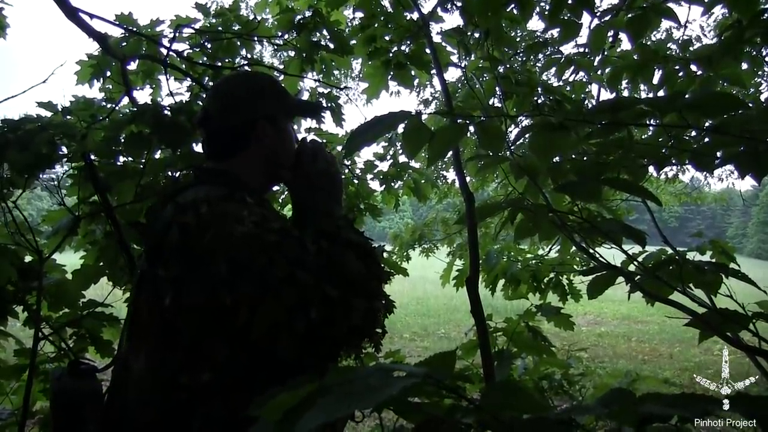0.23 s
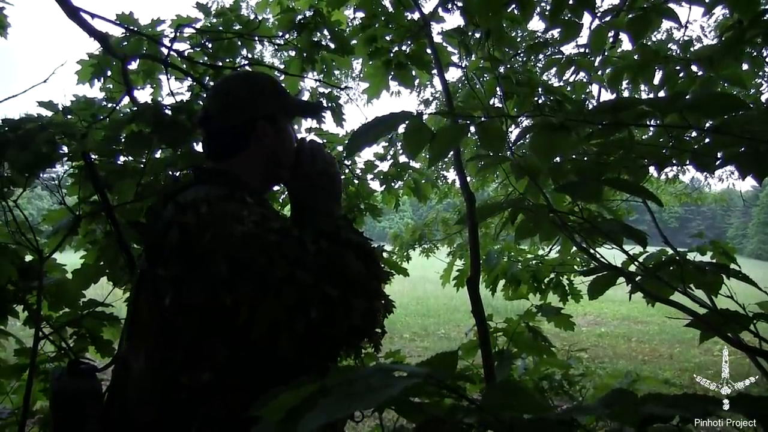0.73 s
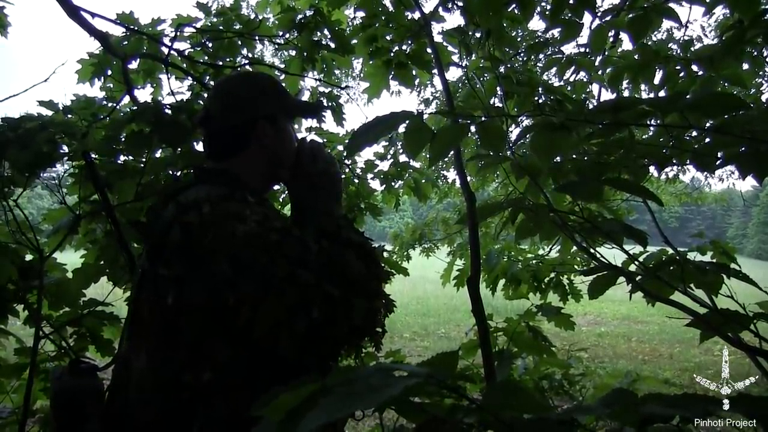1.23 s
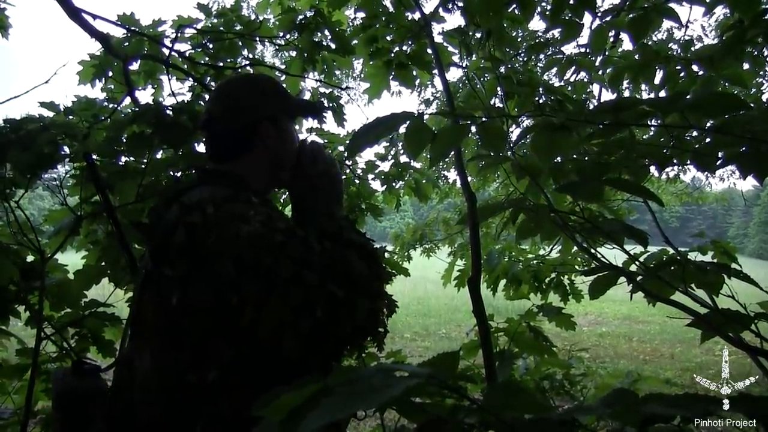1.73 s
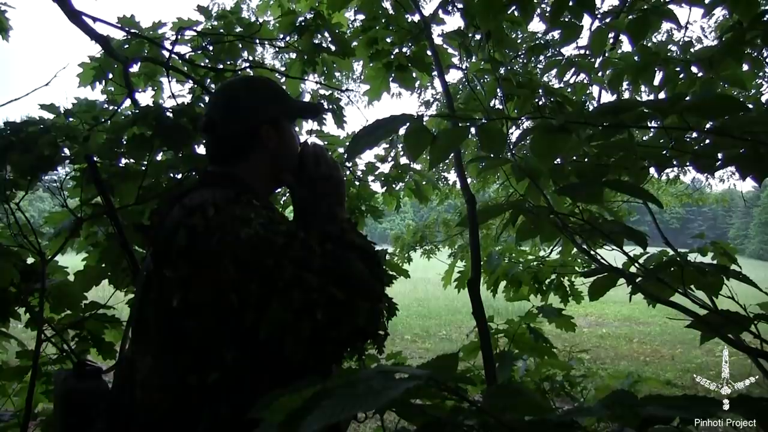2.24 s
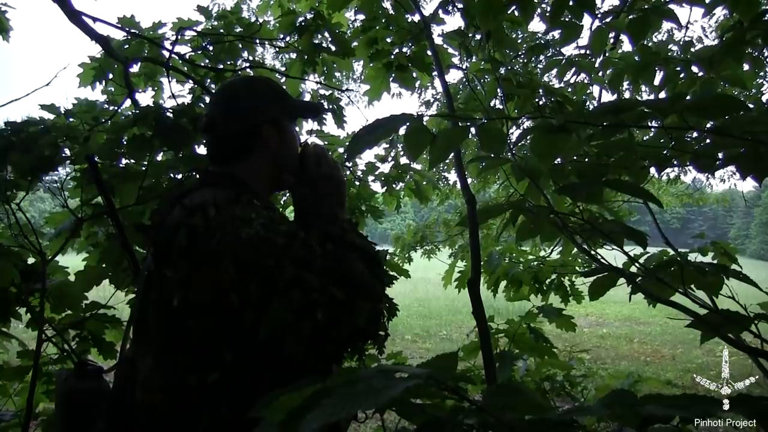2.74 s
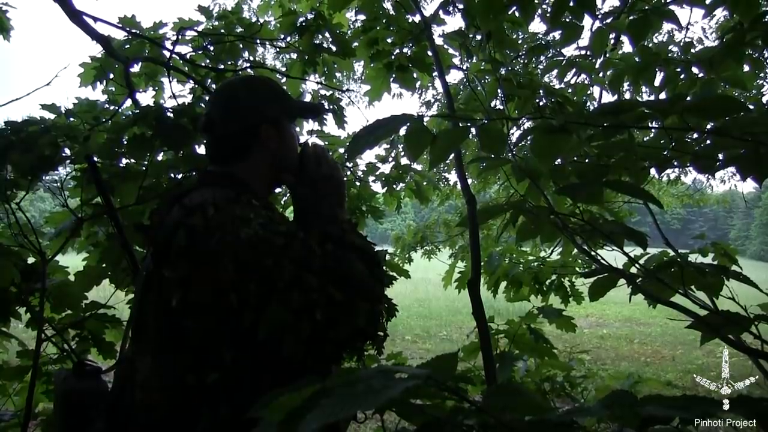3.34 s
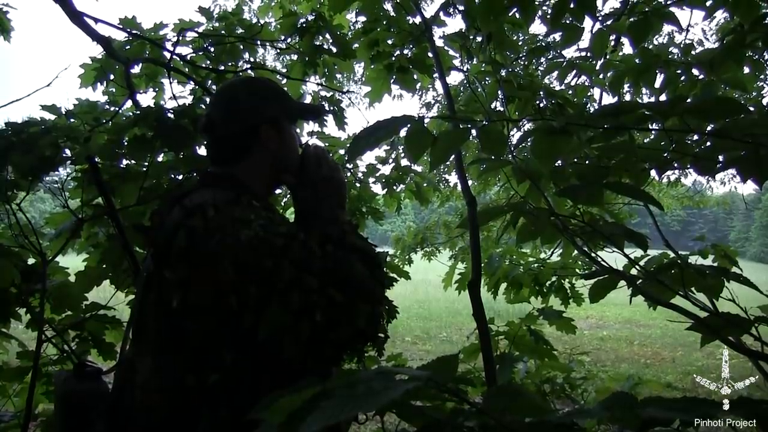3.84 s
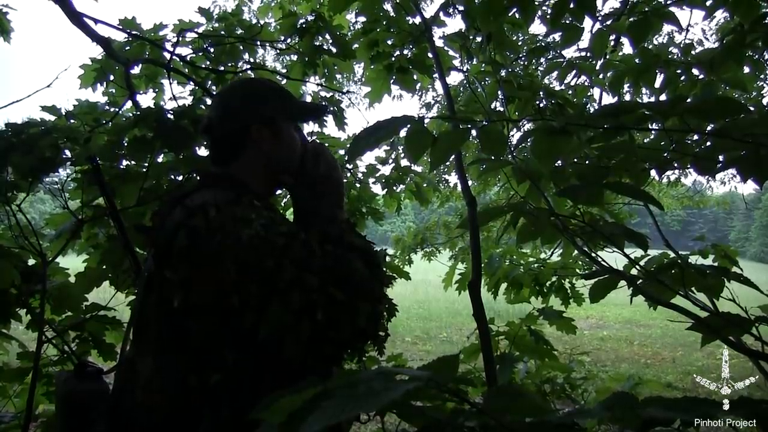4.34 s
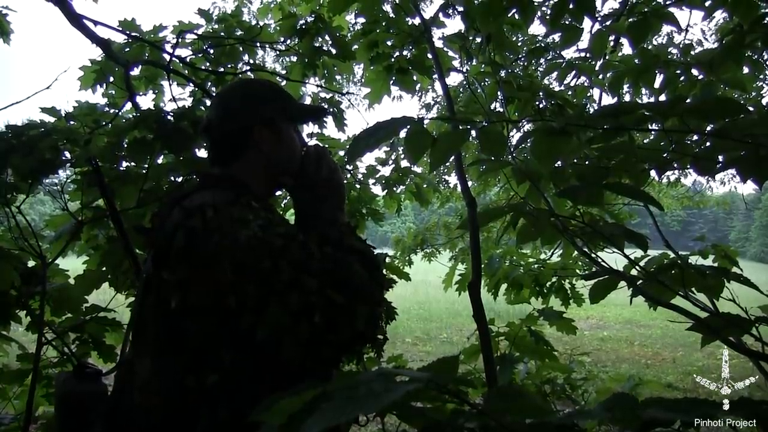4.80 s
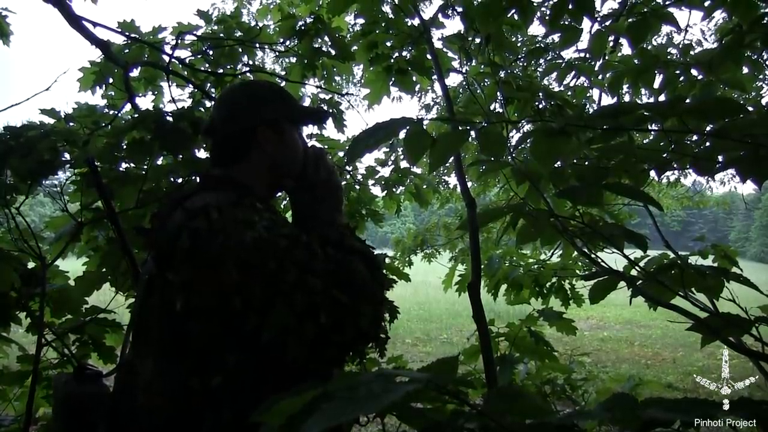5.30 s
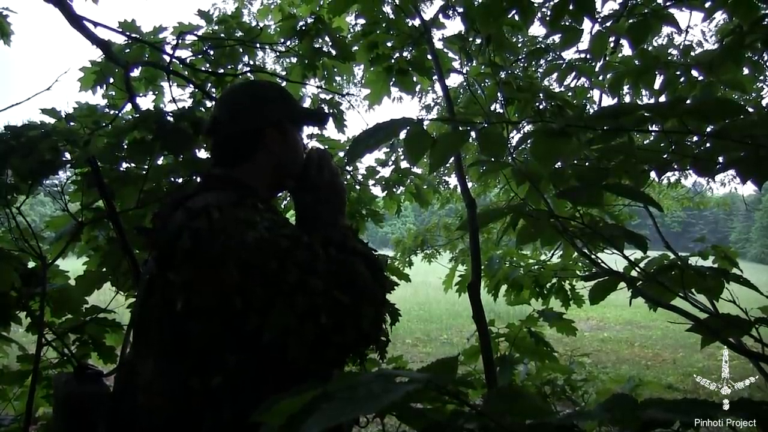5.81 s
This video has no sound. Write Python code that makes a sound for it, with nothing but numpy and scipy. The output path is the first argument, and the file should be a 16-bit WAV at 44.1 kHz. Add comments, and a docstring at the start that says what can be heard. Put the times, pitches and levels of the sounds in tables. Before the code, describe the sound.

Quiet summer woods with constant cricket chirping, sliding birdsong and distant hoarse caws, then two bright hollow drop-like plops close to the microphone.

```python
"""A forest edge in summer, with two water-drop plops close to the microphone: ringing cavities that leap in pitch.
The trees answer them with decaying noise echoes. A songbird whistles short gliding tones among the leaves;
faint whistles come from deeper in the wood, and a crow caws four hoarse harmonic stacks far off.
Crickets chirp in short falling notes without a break, over soft low bumps, hissing air and a distant rumble.
The camera's limiter ducks the background for a moment after each plop."""
import sys
import numpy as np
from scipy import signal
from scipy.fft import rfft, irfft, next_fast_len
from scipy.io import wavfile
from scipy.ndimage import map_coordinates

SR = 44100
rng = np.random.default_rng(int(sys.argv[2]) if len(sys.argv) > 2 else 0)


def wav_out(sig):
    """Save sig, one row per channel (or a flat mono array), as 16-bit PCM at SR to the path in sys.argv[1]."""
    wavfile.write(sys.argv[1], SR, np.round(np.clip(np.atleast_2d(sig).T, -1, 1) * 32767).astype(np.int16))


N = 267246  # length in samples


def amp(db):
    """Amplitude factor for a level in dB."""
    return 10 ** (np.asarray(db) / 20)


def unit(x):
    """x scaled to rms 1."""
    return x / np.sqrt(np.mean(x ** 2) + 1e-20)


def along(points, hz):
    """Values at hz, read between (f/Hz, value) points on a log frequency axis."""
    f, v = np.transpose(points)
    return np.interp(np.log(hz + 1), np.log(f + 1), v)


def wobble(rate, size=N):
    """A smooth random curve with `rate` random knots a second."""
    knots = rng.standard_normal(int(size * rate / SR) + 4)
    return map_coordinates(knots, [np.arange(size) * rate / SR])


def ramp(x):
    """A smooth step from 0 to 1 as x goes from 0 to 1."""
    return np.sin(np.pi / 2 * np.clip(x, 0, 1)) ** 2


def filtered(x, response):
    """x times a response of frequency, padded so that its tail does not wrap onto the start."""
    m = next_fast_len(len(x) + 8192)
    spectrum = rfft(x, m) * response(np.fft.rfftfreq(m, 1 / SR))
    return irfft(spectrum, m)[:len(x)]


def coloured(x, spectrum):
    """x shaped by (f/Hz, level/dB) points, at rms 1."""
    return unit(filtered(x, lambda hz: amp(along(spectrum, hz))))


def noise(spectrum, size=N):
    """Noise of rms 1 shaped by the given spectrum."""
    return coloured(rng.standard_normal(size), spectrum)


def add(track, s, sound):
    """Mix a sound into the track at time s."""
    part = track[max(0, round(s * SR)):][:len(sound)]
    part += sound[:len(part)]


def turning(hz):
    """Phase of a tone with a moving pitch."""
    return 2 * np.pi * np.cumsum(hz) / SR


def foliage(x, t60, delay):
    """Nearby leaves and trunks scatter a short, dense echo: decaying noise after a delay in s."""
    t = np.arange(SR // 2) / SR
    tail = rng.standard_normal(len(t)) * amp(-60 * t / t60) * (t > delay)
    return signal.fftconvolve(x, tail / np.linalg.norm(tail))[:N]


def forest(x, build):
    """The far trees: an echo that builds up over `build` s while each frequency dies at its own speed."""
    # decay of the forest's echo: f/Hz, t60/s
    wood_decay = [(200, 0.38), (800, 1.58), (1250, 2.184), (1900, 1.4), (3200, 2), (8000, 0.847)]
    hz, t, bins = signal.stft(rng.standard_normal(2 * SR), SR, nperseg=256)
    decay = amp(-60 * t / along(wood_decay, hz)[:, None])
    tail = signal.istft(bins * decay * (1 - np.exp(-t / build)), SR, nperseg=256)[1]
    return signal.fftconvolve(x, tail / np.linalg.norm(tail))[:N]


def air(air_db=-54, rumble_db=-59):
    """Two shaped noises: a hiss and a distant rumble, each wandering slightly in level."""
    # open air and far leaves: f/Hz, relative level/dB per Hz
    air_colour = [(20, -45.5), (60, -24.5), (200, -2.5), (450, -0.5), (900, -3.5), (1300, -5), (2300, -5),
                  (2900, -2), (3500, -2.5), (4200, -3.5), (5600, -4), (8000, -7.5), (12000, -11),
                  (15800, -16)]
    # distant rumble: f/Hz, relative level/dB per Hz
    rumble_colour = [(20, -49), (40, -27.5), (65, -16.5), (95, -6), (120, -2), (170, -5.5), (260, -9),
                     (500, -19), (1200, -48)]
    hiss = amp(air_db + 0.65 * wobble(3.2)) * noise(air_colour)
    rumble = amp(rumble_db + 0.38 * wobble(5)) * noise(rumble_colour)
    return hiss + rumble


def bumps(rise=0.00335, t60=0.07):
    """Dull low thuds: sines that rise within milliseconds (s) and die away after a few cycles."""
    # soft low bumps: t/s, f/Hz, approximate peak level/dB
    thuds = [(1.395, 127.5, -34.5), (1.425, 115, -38.5), (1.456, 108.8, -41), (4.331, 115.8, -44)]
    out, t = np.zeros(N), np.arange(SR // 4) / SR
    for s, hz, db in thuds:
        envelope = 2 * amp(db - 60 * t / t60) * (1 - np.exp(-(t / rise) ** 2))  # 2 offsets the early decay
        add(out, s, envelope * np.sin(2 * np.pi * hz * t))
    return out


def crickets(count=440, start_hz=4960, fall=0.122, length=0.02685, near_db=-53.5, far_db=-54, drift_db=0.92):
    """Every wing stroke is a short falling note; the far insects blur into one band of noise."""
    # the far insects' band: f/Hz, relative level/dB
    chorus = [(3600, -32), (4100, -8.5), (4450, -1.5), (4700, -2.5), (4900, 2), (5030, -5.5), (5110, -0.5),
              (5280, -13), (5700, -50)]
    strokes = np.zeros(N)
    u = np.linspace(0, 1, int(length * SR))
    for k, (when, pitch, size) in enumerate(rng.standard_normal((count, 3))):
        hz = start_hz * (1 + .022 * pitch) * (1 - fall * u ** 1.373)
        loudness = amp(5 * np.tanh(size))  # within 5 dB either way
        stroke = loudness * np.sin(np.pi * u) * np.sin(turning(hz))
        add(strokes, (k + .7 * when) * N / SR / count, stroke)  # evenly spaced, then scattered
    return amp(drift_db * wobble(3.0)) * (amp(near_db) * unit(strokes) + amp(far_db) * noise(chorus))


def far_whistles(direct_db=-2, leaves_db=-5, wood_db=-8):
    """Thin gliding tones with a random warble, blurred by the trees."""
    # whistles from deeper in the wood, levels ahead of the tree echoes and mix:
    # t/s, length/s, start f/Hz, end f/Hz, random warble/Hz, peak level/dB
    whistles = [(0.129, 0.084, 3270, 2800, 200, -68.5), (0.426, 0.075, 2720, 3050, 100, -59),
                (3.179, 0.26, 3310, 3295, 10.6, -55.5), (3.845, 0.171, 3255, 3220, 8.26, -52.5),
                (4.559, 0.127, 3720, 3190, 260, -55), (4.667, 0.076, 3230, 3780, 278, -57.5),
                (4.857, 0.159, 3920, 3316, 322, -51.5), (5.58, 0.053, 3070, 3750, 264, -50.5),
                (5.66, 0.079, 3660, 3130, 240, -55.5), (5.908, .07, 7050, 7000, 33.3, -60),
                (5.95, 0.092, 6400, 6340, 21, -58)]
    out = np.zeros(N)
    for s, length, start_hz, end_hz, warble_hz, db in whistles:
        u = np.linspace(0, 1, int(length * SR))
        hz = start_hz + (end_hz - start_hz) * u + warble_hz * wobble(200, size=len(u))
        add(out, s, amp(db) * np.sqrt(4 * u * (1 - u)) * np.sin(turning(hz)))
    leaves = amp(leaves_db) * foliage(out, t60=0.134, delay=0.0099)
    return amp(direct_db) * out + leaves + amp(wood_db) * forest(out, build=0.037)


def crow(arch=.18, rasp_hz=90, rasp=0.66, breakup=4, direct_db=0, leaves_db=-5, wood_db=-6.5):
    """Each caw is an arched harmonic stack that swells early and breaks up into hoarseness."""
    # caws: t/s, length/s, f at the top of the arch/Hz, level before the swell/dB
    caws = [(0.867, 0.2224, 673.9, -44), (1.305, 0.197, 670.5, -43.5), (1.783, .21, 638.3, -45),
            (2.272, 0.1938, 652, -43)]
    # the throat's resonances: f/Hz, relative level/dB
    throat = [(400, -34), (640, -20.5), (900, -18.5), (1080, -6.5), (1190, -2.5), (1340, -3.5), (1500, 2),
              (1700, -2.5), (1900, -15), (2200, -16.5), (2700, -25.5), (3500, -17), (5000, -28.5)]
    jitter, hoarse = .02, .65  # pitch unsteadiness (share) and breath noise, both before strain
    out = np.zeros(N)
    for s, length, hz, db in caws:
        u = np.linspace(0, 1, int(length * SR))
        hump = np.abs(np.sin(np.pi * u ** .7))
        strain = 1 + breakup * u ** 2  # grows towards the end of the caw
        phase = turning(hz * (1 + arch * (hump - 1) + jitter * strain * wobble(249.5, size=len(u))))
        # a slow second oscillator in the throat
        shake = 1 + rasp * np.sin(turning(rasp_hz * (1 + 0.22 * wobble(63.44, size=len(u)))))
        harmonics = sum(np.sin(k * phase) for k in range(1, 8))
        voice = shake * harmonics + hoarse * strain * rng.standard_normal(len(u))
        caw = np.zeros(N)
        add(caw, s, amp(db) * hump * coloured(voice, throat))
        leaves = amp(leaves_db) * foliage(caw, t60=0.308, delay=0.0021)
        out += amp(direct_db) * caw + leaves + amp(wood_db) * forest(caw, build=0.055)
    return out


def songbird(direct_db=0, leaves_db=-11, trunks_db=-15, wood_db=-14, flutter_db=2.5):
    """Pure slurred whistles that flutter through the leaves and come back off the trunks."""
    # notes that slide and swing about that slide: t/s, length/s, start f/Hz, end f/Hz,
    # swing/semitones, swing rate/Hz, time to a crest/s, level before swell and flutter/dB
    song = [ (0.69, 0.0727, 3428, 3906, 4.5, 15.5, 0.002, -46),
            (0.789, 0.0216, 4945, 3435, 1, 0.5, 0, -44.5), (.841, 0.0906, 3092, 2590, 3, 14, 0.0675, -43.5),
            (1.66, 0.1003, 4000, 4110, 3.5, 8.5, 0.1079, -44),
            (1.818, 0.1406, 3345, 2872, 3, 14, 0.0654, -41.5),
            (2.489, 0.085, 3191, 2760, 1.68, 14, 0.037, -42.5),
            (2.61, 0.0855, 3139, 2752, 1.5, 11.5, 0.0353, -41),
            (3.275, 0.037, 4520, 3954, -0.5, 0, 0.0013, -41),
            (3.309, 0.0654, 3177, 2881, 0.98, 17.5, 0.0016, -41.5),
            (3.351, 0.0606, 3463, 3002, 3, 14, 0.0203, -43.5), (4.051, 0.0196, 4463, 3010, 0, -1, 0, -44),
            (4.068, 0.0576, 2850, 3633, 4, 11, 0.0115, -42.5),
            (4.135, 0.0415, 2550, 2442, 1.5, 26.5, .01, -48.5),
            (4.24, 0.0363, 3050, 2904, 3.5, 15.5, 0.0032, -41),
            (4.287, .09, 2850, 3356, 3, 18, .031, -41.5), (5.124, 0.0516, 4403, 3680, 3, 13, 0.037, -43),
            (5.202, 0.0623, 3177, 2958, 2.5, 16.5, 0.00031, -43),
            (5.253, 0.0562, 3689, 3728, 0, 3, 0.011, -39), (5.296, 0.032, 3690, 2585, 0, 0, 0, -42.5),
            (5.919, 0.076, 3877, 3487, 0, 1.5, 0, -43), (6.01, 0.043, 3530, 2716, 0, 1, 0.0036, -44.5)]
    attack_s, release_s = 0.0099, 0.00702
    swell_db = 2.5  # a note is lifted in its middle
    db_per_semitone = 1.186  # and louder where its pitch is higher
    crest_sharp = 0.1134  # crests of the swing are pointed, troughs round
    waver = 0.0057  # random unsteadiness of the pitch (share)
    out = np.zeros(N)
    for s, length, start_hz, end_hz, swing, rate, crest_s, db in song:
        t = np.arange(int(length * SR)) / SR
        angle = 2 * np.pi * rate * (t - crest_s)
        semitones = swing * (np.cos(angle) + crest_sharp * (np.cos(2 * angle) - 1))
        hz = np.linspace(start_hz, end_hz, len(t)) * 2 ** (semitones / 12)
        above = 12 * np.log2(hz / hz.mean())  # semitones over the note's mean pitch
        swell = swell_db * (np.sin(np.pi * t / length) - 2 / np.pi)  # averages 0 dB
        level_db = db + db_per_semitone * above + swell
        envelope = ramp(t / attack_s) * ramp((length - t) / release_s)
        tone = np.sin(turning(hz * (1 + waver * wobble(250.6, size=len(t)))))
        add(out, s, amp(level_db) * envelope * tone)
    out = out * amp(flutter_db * wobble(160))
    leaves = amp(leaves_db) * foliage(out, t60=0.138, delay=0.016)
    trunks = amp(trunks_db) * foliage(out, t60=0.2, delay=0.045)
    return amp(direct_db) * out + leaves + trunks + amp(wood_db) * forest(out, build=0.0067)


def plops(second_db=-24, snap_rise=0.00848, leaves_db=-21, wood_db=-33.5, echo_hz=800):
    """A ringing air cavity with faint upper modes and a wet snap; the trees return mostly its higher end."""
    # cavities whose note leaps upward, then rebounds once: t/s, time to the leap/s,
    # share by which the note starts flat, level of the high note/dB, rebound f/Hz, rebound level/dB
    cavities = [(4.4315, .016, 0.29, -2.5, 1078, -14.5), (5.3737, .0105, .12, -1, 1286, -6.5)]
    # the wet snap as a cavity opens: t/s, snap level/dB, lower mode level/dB, upper mode level/dB
    snaps = [(4.431, -25.5, -50.5, -40), (5.375, -22.5, -34.5, -47.5)]
    # colour of the snap's noise: f/Hz, relative level/dB
    snap_colour = [(150, -16), (350, -28), (520, -0.5), (1000, 16), (1500, 10), (1900, -1.5), (2200, 1),
                   (2550, -25.5), (3450, 0.5), (4600, -19), (5800, -32.5), (8800, -34), (9800, -17),
                   (11000, -34.5), (16000, -32)]
    # the cavity's higher resonances: f/Hz, lower then upper mode
    modes_hz = [2178, 3730]
    low_hz, high_hz, leap_width_s = 758.7, 1131.5, 0.00138  # before and after the leap; how fast it leaps
    low_note_db = -6.5  # the low note against the high one
    settle_s = 0.00287  # the flat start settles onto the low note
    open_share, hold_s, close_s = 0.477, 0.0025, .0045  # attack / time to the leap; hold after it; release
    # the rebound: its middle after the leap, its length, its rise in pitch (share)
    rebound_after_s, rebound_s, rebound_rise = .0115, 0.011116, 0.278
    out, t = np.zeros(N), np.arange(SR // 10) / SR
    u = np.linspace(0, 1, int(rebound_s * SR))
    for s, leap_s, flat, db, rebound_hz, rebound_db in cavities:
        leapt = (1 + np.tanh((t - leap_s) / leap_width_s)) / 2
        low_note = low_hz * (1 - flat * np.exp(-t / settle_s))
        phase = turning(low_note + (high_hz - low_hz) * leapt)
        envelope = ramp(t / (open_share * leap_s)) * (1 - ramp((t - leap_s - hold_s) / close_s))
        overtone = amp(second_db) * np.exp(-t / leap_s) * np.sin(2 * phase)  # fades as the cavity settles
        add(out, s, amp(db + low_note_db * (1 - leapt)) * envelope * (np.sin(phase) + overtone))
        rebound_pitch = rebound_hz * (1 + rebound_rise * (u - .5))
        rebound = np.sin(np.pi * u) ** 2 * np.sin(turning(rebound_pitch))
        add(out, s + leap_s + rebound_after_s - rebound_s / 2, amp(rebound_db) * rebound)
    swell = (t / snap_rise * np.exp(1 - t / snap_rise)) ** 1.35  # peaks at 1 after snap_rise s
    for s, snap_db, *mode_db in snaps:
        ring = sum(amp(db) * np.sin(2 * np.pi * hz * t) for hz, db in zip(modes_hz, mode_db))
        add(out, s, swell * (ring + amp(snap_db) * noise(snap_colour, size=len(t))))
    high_pass = signal.butter(2, echo_hz, "high", fs=SR, output="sos")
    scattered = signal.sosfilt(high_pass, out)
    leaves = amp(leaves_db) * foliage(scattered, t60=0.12, delay=.018)
    return out + leaves + amp(wood_db) * forest(scattered, build=0.0188)


def scene():
    """The forest edge at the microphone, from the far air to the near plops, on one channel."""
    background = air() + bumps() + crickets()
    return (background + far_whistles() + crow() + songbird() + plops())[None]


def limiter(x, limit_db=-8, attack=0.0014, release=0.042):
    """Peaks over the limit pull the gain down fast; it creeps back afterwards (times in s)."""
    over_db = np.maximum(20 * np.log10(np.abs(x) + 1e-9) - limit_db, 1e-9)
    age = np.arange(N) / SR / release
    # each excess is held as a decaying exponential until a larger one takes over
    held_db = np.exp(np.maximum.accumulate(np.log(over_db) + age) - age)
    keep = np.exp(-1 / (attack * SR))
    return x * amp(-signal.lfilter([1 - keep], [1, -keep], held_db))


def record(dry, low_cut_hz=50, top_hz=15750):
    """The camera limits loud peaks, cuts the deepest bass and keeps nothing above its band limit."""
    low_cut = signal.butter(3, low_cut_hz, "high", fs=SR, output="sos")
    limited = signal.sosfilt(low_cut, limiter(dry[0]))
    return filtered(limited, lambda hz: hz < top_hz)[None]


dry = scene()
out = record(dry)
wav_out(out)
```